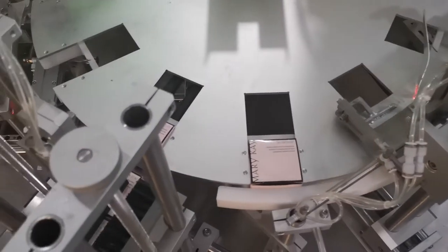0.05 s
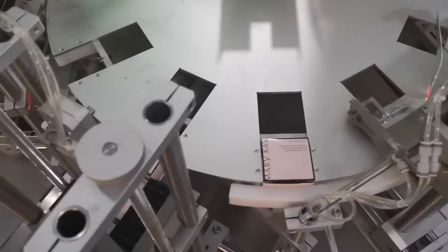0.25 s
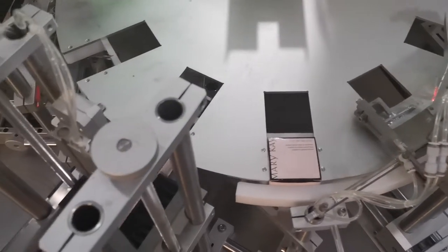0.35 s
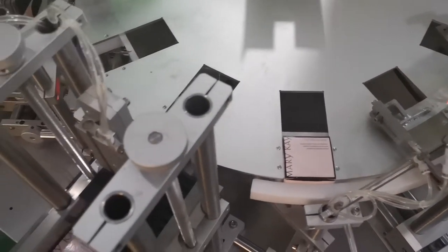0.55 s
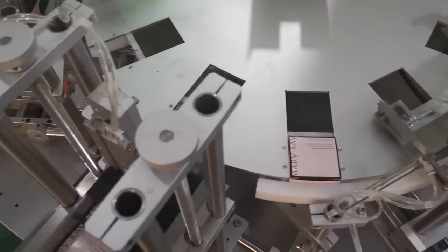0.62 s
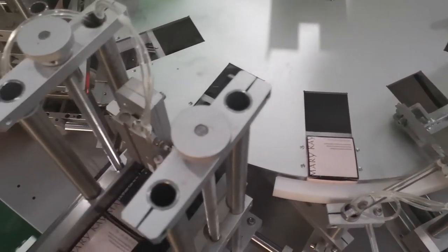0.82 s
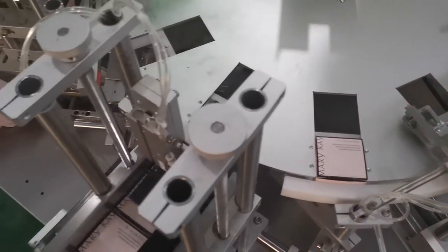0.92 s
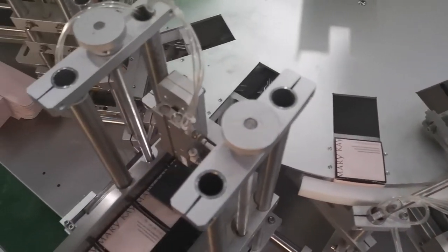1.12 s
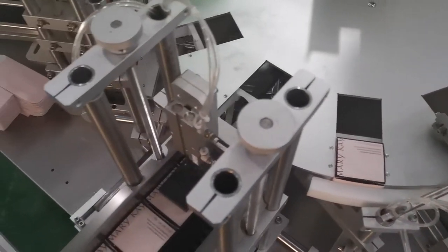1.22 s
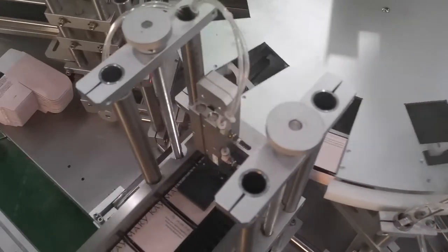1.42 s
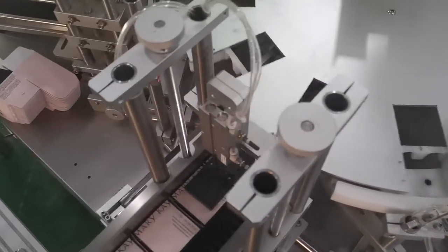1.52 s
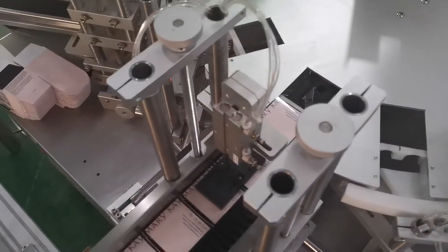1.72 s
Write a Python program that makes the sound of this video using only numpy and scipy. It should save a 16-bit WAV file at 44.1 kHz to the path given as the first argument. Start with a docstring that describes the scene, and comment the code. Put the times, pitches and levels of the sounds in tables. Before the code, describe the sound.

Quick metallic clacks and thumps from a pneumatic factory machine, with hissing air release.

```python
"""A pneumatic cartoning machine runs through one cycle, heard from close above its turntable.
Slides and grippers clack against their stops, and the impacts excite the modes of panels, frame and steel.
Strokes end in dull thumps and hollow knocks, both heavily damped vibrations. Compressed air hisses from
the valves through a resonant exhaust pipe, then bleeds away and leaves the hum of the factory hall."""
import sys
import numpy as np
from scipy import signal
from scipy.io import wavfile

SR = 44100
rng = np.random.default_rng(int(sys.argv[2]) if len(sys.argv) > 2 else 0)


def unload_wav(signal):
    """Save mono or channel-first audio to the path in sys.argv[1] as 16-bit WAV at rate SR, clipped to [-1, 1]."""
    wavfile.write(
        sys.argv[1],
        SR,
        np.round(np.clip(np.atleast_2d(signal).T, -1, 1) * 32767).astype(np.int16),
    )


N = 77175
T = np.arange(N) / SR
ATTACK_S, BASS_PAN_DB = 0.0022, 3
# each side hears a different colour: frequency_hz, left_minus_right_db
SIDE_BALANCE = [(750, 3), (1400, -2), (2800, 4.5), (5600, -7.5), (11000, 5)]


def from_db(db):
    """Amplitude grows tenfold with every 20 dB."""
    return 10 ** (np.asarray(db) / 20)


def rms_one(x):
    """Normalisation to unit rms."""
    return x / np.sqrt(np.mean(x ** 2) + 1e-20)


def pan(db):
    """A level difference places a sound: left and right gains, positive to the left."""
    return from_db(np.array([[.5], [-.5]]) * db)


def at_hz(points, hz):
    """Interpolation of a table on a log-frequency axis."""
    frequencies, values = np.transpose(points)
    return np.interp(np.log(hz), np.log(frequencies), values)


def drift(rate_hz):
    """Random modulation: straight lines between standard normal values."""
    return np.interp(T * rate_hz, np.arange(N), rng.standard_normal(N))


def noise_bands():
    """Partial coherence: narrow bands of stereo noise, alike in the bass and diffuse in the treble."""
    # likeness of left and right: frequency_hz, correlation
    coherence = [(250, 0.89), (550, 0.45), (1100, 0)]
    edges = 22 * 2 ** (np.arange(25) / 2.5)
    white = rng.standard_normal((2, 2, N + SR // 4))
    for k, hz in enumerate(np.sqrt(edges[1:] * edges[:-1])):
        sos = signal.butter(2, edges[k:k + 2], "band", fs=SR, output="sos")
        mid, side = signal.sosfilt(sos, white[k % 2])[:, -N:]
        alike = np.clip(at_hz(coherence, hz), -1, 1)
        stereo = np.sqrt(1 + alike) * mid + np.sqrt(1 - alike) * side * [[1], [-1]]
        yield hz, pan(at_hz(SIDE_BALANCE, hz)) * rms_one(stereo)


def resonant_noise(hz, width_hz):
    """A resonance selects one band from white stereo noise; rms about 1."""
    sos = signal.butter(1, [max(hz - width_hz / 2, 20), hz + width_hz / 2], "band", fs=SR, output="sos")
    band = signal.sosfilt(np.vstack([sos, sos]), rng.standard_normal((2, N)))
    return pan(at_hz(SIDE_BALANCE, hz)) * rms_one(band)


def struck(modes, blows, spread_db):
    """Modal superposition: each blow excites every decaying mode with a partly random strength."""
    start_s, blow_db = np.transpose(blows)
    scatter_db = spread_db * rng.standard_normal((len(blows), len(modes)))
    out = 0
    for k, (hz, mode_db, t60) in enumerate(modes):
        impulses = np.full(N, 1e-18)
        polarity = (-1) ** (k // 2)
        impulses[(start_s * SR).astype(int)] = polarity * from_db(blow_db + mode_db + scatter_db[:, k])
        radius, angle = np.exp(-np.log(1000) / (t60 * SR)), 2 * np.pi * hz / SR
        feedback = [1, -2 * radius * np.cos(angle), radius ** 2]
        out = out + signal.lfilter([0, np.sin(angle)], feedback, impulses)
    return out


def damped_swing(start_s, hz, peak_db, swell_s, steepness=2.56):
    """Heavy damping: a vibration swells and dies within a few cycles."""
    age = np.maximum(T - start_s, 0)
    envelope = (age / swell_s * np.exp(1 - age / swell_s)) ** steepness
    return from_db(peak_db) * envelope * np.sin(2 * np.pi * hz * age)


def factory_hum(waver_db=-0.9):
    """Other machines in the hall add incoherently to a steady, slightly wavering wash."""
    # spectrum of the hum: frequency_hz, band_level_db
    spectrum = [(28, -73), (110, -58), (1000, -61), (4000, -68), (9500, -71.5), (12000, -105)]
    return sum(noise * from_db(at_hz(spectrum, hz) + waver_db * drift(11)) for hz, noise in noise_bands())


def slide_rumble():
    """Rolling noise of the guides drives a broad, low resonance of the frame."""
    # rumble as the slides travel: time_s, level_db
    travel = [(0, -64), (.19, -43.5), (.45, -46), (.705, -59), (.735, -38), (.85, -40.5), (1.1, -51.5)]
    level = from_db(np.interp(T, *np.transpose(travel)))
    return level * resonant_noise(224.5, width_hz=282)[0] * pan(BASS_PAN_DB)


def exhaust_hiss(flutter_db=-0.5, broad_db=-7, pipe_db=-7, fall_db=0.98, pipe_q=10):
    """Turbulent air makes a broad hiss and excites the exhaust pipe's evenly spaced resonances."""
    # air leaving the valves: time_s, level_db
    outflow = [(.125, -84), (.158, -41), (.3, -38.5), (.41, -47), (.52, -44), (.62, -49), (.70, -98),
               (.74, -47), (.79, -38), (.93, -43), (1.08, -54.5), (1.18, -48), (1.42, -57), (1.56, -72)]
    # spectrum of the broad hiss: frequency_hz, gain_db
    colour = [(900, -5), (2600, 8), (11000, 2), (12500, -3.5)]
    broad = 0
    for hz, noise in noise_bands():
        low_cut_db = 60 * (hz < colour[0][0])
        broad = broad + noise * from_db(at_hz(colour, hz) + flutter_db * drift(36.4) - low_cut_db)
    pipe_hz = 2370 + 1422 * np.arange(7)
    pipe = sum(from_db(pipe_db - fall_db * k) * resonant_noise(hz, hz / pipe_q)
               for k, hz in enumerate(pipe_hz))
    level = from_db(np.interp(T, *np.transpose(outflow)))
    return level * (from_db(broad_db) * rms_one(broad) + pipe)


def thumps():
    """Cushioning damps the end of a stroke to a brief low vibration, heard to the left."""
    # ends of strokes: start_s, pitch_hz, peak_db
    strokes = [(0.136, 110.7, -29), (0.222, 100.4, -22), (0.488, 95, -39), (0.777, 98, -30.5),
               (0.921, 89, -32), (1.001, 87, -37.5), (1.135, 89, -36.5)]
    return sum(damped_swing(*stroke, swell_s=0.013) for stroke in strokes) * pan(5.5)


def throttle_jets():
    """Jet noise: a throttle sings in one band while its cylinder moves."""
    # flow through the throttles: start_s, length_s, pitch_hz, level_db
    jets = [(0.157, 0.088, 5450, -46.5), (0.223, 0.06, 2520, -39), (0.232, 0.084, 4750, -40.5),
            (1.117, 0.18, 4740, -43.5)]
    out = 0
    for start_s, length_s, hz, db in jets:
        progress = np.clip((T - start_s) / length_s, 0, 1)
        opening = np.sqrt(np.abs(np.sin(np.pi * progress)))
        out = out + from_db(db) * opening * resonant_noise(hz, width_hz=1100)
    return out


def clacks(crack_db=4, crack_s=0.0012, grain_db=1, bass_exponent=0.25):
    """Impacts excite dense panel modes that overlap into a grainy rattle; the hall reverberates."""
    # points of each impact's spectrum: frequency_hz
    spectrum_hz = [220, 550, 1100, 2700, 9000]
    # parts hit their stops: start_s, level_db at each of the five spectrum_hz, rattle_t60_s
    impacts = [ (0.296, -59, -42.5, -30, -40, -52, 0.19), (0.3084, -24, -28.5, -24, -26.5, -43, 0.098),
               (0.338, -28, -30, -29.5, -27, -38.5, 0.12), (0.4278, -75, -43, -49, -31.5, -29.5, 0.12),
               (0.57, -45, -52, -94, -30, -32, 0.16), (0.586, -29, -50, -42.5, -35, -32.5, 0.11),
               (0.627, -49, -35, -57, -65, -47, 0.16), (0.75, -22.5, -22, -32.5, -25, -26.5, 0.11),
               (0.767, -24, -31, -37.5, -26.5, -102, 0.17), (0.837, -26, -38, -38.5, -29, -31.5, 0.041),
               (0.851, -32.5, -34, -28, -29.5, -40.5, 0.18), (0.894, -19.5, -29, -31.5, -29.5, -26, 0.18),
               (1.035, -28, -43, -39.5, -34.5, -46, 0.15), (1.121, -50, -47, -36.5, -34, -43, 0.1),
               (1.129, -26.5, -42, -36.5, -29, -31.5, 0.15), (1.252, -46, -45.5, -29, -40, -68, 0.17),
               (1.309, -40, -60, -39, -48.5, -38.5, 0.22), (1.446, -43.5, -36.5, -37, -41.5, -59, 0.17),
               (1.624, -39, -31, -40.5, -77, -74, 0.042)]
    # response of the panels: frequency_hz, gain_db
    panels = [(50, -49), (130, -17), (250, -4.5), (1150, 3), (1700, -2), (2600, -1), (10300, -5),
              (12500, -31.5)]
    # the hall's tail relative to the clack: frequency_hz, gain_db
    hall_gain = [(150, -35), (1200, -24.5), (10000, -42)]
    # reverberation time of the hall: frequency_hz, t60_s
    hall_t60 = [(150, 0.3), (10000, 1)]
    rows, coarse_s = np.array(impacts), T[::16]
    age = np.maximum(coarse_s - rows[:, :1], 0)
    onset = (1 - np.exp(-age / ATTACK_S)) ** 2
    crack = from_db(crack_db) ** 2 * np.exp(-age / crack_s)   # first contact stands out of the rattle
    grain = rms_one(from_db(grain_db * drift(700)))
    decay = -2 * np.log(1000) * age   # power falls 60 dB in one t60
    out = 0
    for hz, noise in noise_bands():
        impact_db = np.array([np.interp(np.log(hz), np.log(spectrum_hz), row[1:-1]) for row in rows])
        power = from_db(impact_db + at_hz(panels, hz))[:, None] ** 2 * onset
        t60 = rows[:, -1:] * max(spectrum_hz[2] / hz, 1) ** bass_exponent   # the bass lingers
        rattle = (power * (np.exp(decay / t60) + crack)).sum(axis=0)
        tail = (power * np.exp(decay / at_hz(hall_t60, hz))).sum(axis=0)
        tail *= from_db(at_hz(hall_gain, hz)) ** 2
        band_power = np.interp(T, coarse_s, rattle) * grain ** 2 + np.interp(T, coarse_s, tail)
        out = out + noise * np.sqrt(band_power)
    return out


def knocks(lag_s=0.00031):
    """Damped hollow resonances, placed to the left by a time and a level difference."""
    # hollow knocks: start_s, pitch_hz, peak_db, swell_s
    blows = [(.2975, 1000, -23, 0.0034), (.311, 1130, -14.5, .0028), (.3385, 514, -22.5, 0.0021),
             (.340, 2300, -12.5, 0.00088), (.752, 755, -17.5, .005), (.852, 1010, -3.5, 0.0017),
             (1.2505, 2480, -30.5, 0.003), (1.2535, 852, -25, 0.0055), (1.259, 1151, -20, 0.0048),
             (1.344, 1150, -26, 0.0019), (1.533, 337, -30, 0.0031)]
    left = sum(damped_swing(*blow) for blow in blows)
    right = sum(damped_swing(start_s + lag_s, *shape) for start_s, *shape in blows)
    return np.array([left, right]) * pan(2)


def frame_boom():
    """Free vibration: after a heavy blow the frame booms as one body in its low modes."""
    # modes of the frame: pitch_hz, gain_db, t60_s
    modes = [(170.57, 0.5, 0.69), (253.2, -4, 0.34), (273.3, -7, 0.61), (335.5, -2.5, 0.35),
             (372.2, -4, 0.27), (492, -1, 0.29), (858, -1.5, 0.17)]
    # blows that reach the frame: start_s, level_db
    jolts = [(0.312, -32), (.753, -28.5), (.898, -31.5), (1.02, -43.5), (1.452, -38.5)]
    return struck(modes, jolts, spread_db=2) * pan(BASS_PAN_DB)


def fitting_pings():
    """Small struck steel fittings each ring in a narrow band that decays exponentially."""
    # hits on the fittings: start_s, pitch_hz, level_db, t60_s
    pings = [(0.428, 1083, -25, 0.089), (0.427, 1424, -31, 0.081), (0.625, 10240, -40.5, 0.13),
             (1.446, 2860, -32, 0.06)]
    out = 0
    for start_s, hz, db, t60 in pings:
        age = np.maximum(T - start_s, 0)
        envelope = np.minimum(age / ATTACK_S, 1) * np.exp(-np.log(1000) * age / t60)
        out = out + from_db(db) * envelope * resonant_noise(hz, width_hz=200)
    return out


def steel_stops(detune=0.0216):
    """Struck stops ring in clusters of three close modes that beat, differently on each side."""
    # modes of the stops: pitch_hz, gain_db, t60_s
    modes = [(3050, 0.5, 0.092), (3490, -9.5, .08), (5460, -13.5, 0.18), (7860, -3, 0.056),
             (10270, -9.5, 0.11)]
    # bare steel meets a stop: start_s, level_db
    hits = [(.428, -26.5), (.572, -40), (.897, -35.5), (1.036, -39), (1.13, -37.5), (1.311, -44)]
    sides = []
    for _ in range(2):
        clusters = [(hz * (1 + detune * rng.uniform(-0.96, 1)), db, t60)
                    for hz, db, t60 in modes for _ in range(3)]
        sides.append(struck(clusters, hits, spread_db=1))
    return np.array(sides)


def scene():
    """Superposition of the machine's impacts, rumble and air with the hall's hum."""
    impacts = clacks() + frame_boom() + steel_stops() + fitting_pings() + thumps() + knocks()
    return impacts + slide_rumble() + exhaust_hiss() + throttle_jets() + factory_hum()


def record(dry):
    """An elliptic low-pass filter cuts the top treble steeply."""
    cutoff_hz = 15400
    return signal.sosfilt(signal.ellip(10, .1, 80, cutoff_hz, fs=SR, output="sos"), dry)


dry = scene()
out = record(dry)
unload_wav(out)
```